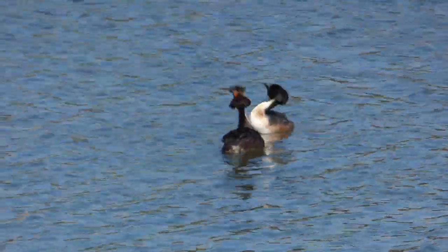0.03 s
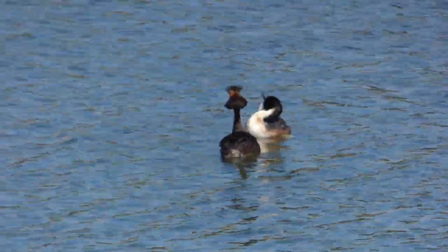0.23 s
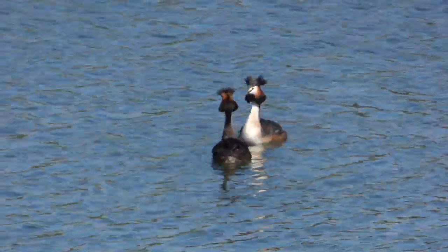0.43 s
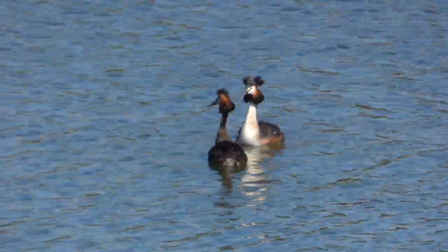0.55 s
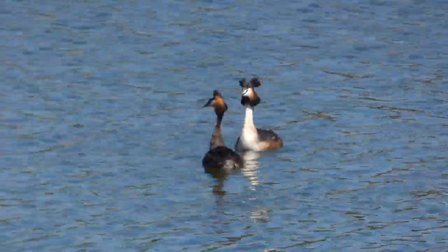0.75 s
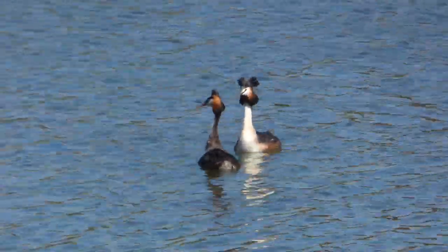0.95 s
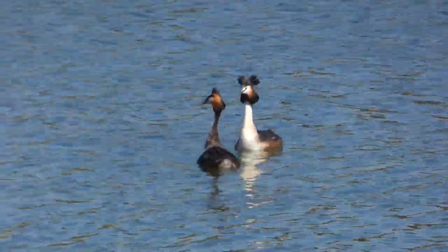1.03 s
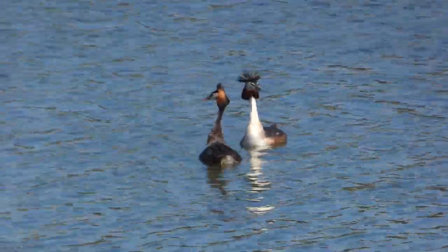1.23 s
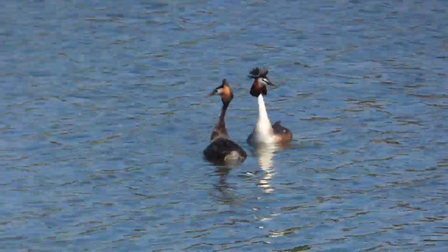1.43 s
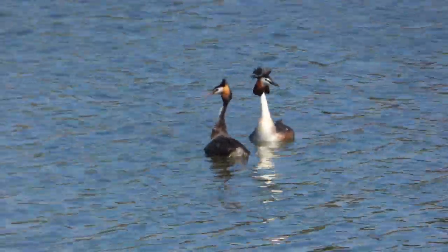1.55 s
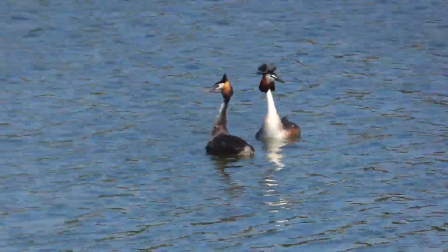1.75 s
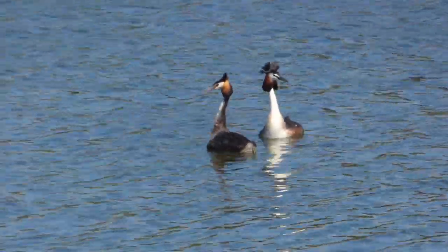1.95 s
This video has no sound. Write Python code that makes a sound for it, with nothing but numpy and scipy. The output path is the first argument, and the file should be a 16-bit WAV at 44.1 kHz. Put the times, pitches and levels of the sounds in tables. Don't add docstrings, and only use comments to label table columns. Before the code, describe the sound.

A waterbird's harsh rasping call stands out on an open lake: after quiet hum and hiss, it starts faintly at 0.2 s, swells by 0.35 s, climbs in pitch with a fast throaty flutter, and ends near 0.85 s with a short reedy echo. From 1.0 to 1.6 s a far, blurred call answers faintly. Light handling taps and rustles follow, mostly after 1.5 s, over distant traffic and faint motor noise.

```python
import sys
import numpy as np
from scipy import signal
from scipy.fft import rfft, irfft
from scipy.io import wavfile
from scipy.ndimage import uniform_filter1d

SR = 44100
rng = np.random.default_rng(int(sys.argv[2]) if len(sys.argv) > 2 else 0)


def store_pcm(level_fs):
    pcm = np.round(np.clip(level_fs, -1, 1) * 32767).astype(np.int16)
    wavfile.write(sys.argv[1], SR, np.atleast_2d(pcm).T)


def convert_level_to_amplitude(level_db):
    exponent = np.asarray(level_db, float) / 20
    return 10 ** exponent


N = 88200
NOTCH_HZ = 10700


def unit(x):
    return x / np.sqrt(np.mean(x ** 2))


def band(x, hz, width):
    return signal.lfilter(*signal.iirpeak(hz, max(hz / width, .3), fs=SR), x)


def walk(rate):
    hold = int(SR / rate)
    steps = np.repeat(rng.standard_normal(N // hold + 1), hold)
    return unit(uniform_filter1d(uniform_filter1d(steps, hold), hold)[:N])


def throat_flaps(t, flap_at):
    period_s, slowing_s, jitter_s = .01456, .0000154, .0005
    width_s, scatter_db = .0018, 1.3
    k = np.arange(-28, 22)
    late, strength = rng.standard_normal((2, len(k)))
    times = flap_at + period_s * k + slowing_s * k ** 2 + jitter_s * late
    pulses = np.exp(-.5 * ((t - times[:, None]) / width_s) ** 2)
    return (convert_level_to_amplitude(scatter_db * strength)[:, None] * pulses).sum(axis=0)


def whistle(hz, flap, second_db, upper_db):
    dip = flap ** 2 * (.16 + .11 * walk(1200))
    pitch = hz * (1 + .006 * walk(250) - dip)
    phase = 2 * np.pi * np.cumsum(pitch) / SR
    tone = 0
    for harmonic, db in [(1, 0), (2, second_db)]:
        tone = tone + convert_level_to_amplitude(db + 1.8 * walk(180)) * np.sin(harmonic * phase)
    for harmonic, db in [(3, 0), (4, -20), (5, -2.5)]:
        blur = 1.1 * walk(700)
        tone += convert_level_to_amplitude(upper_db + db) * np.sin(harmonic * phase + blur)
    sub_hz = .44 * hz * (1 + .06 * walk(200))
    sub = np.sin(2 * np.pi * np.cumsum(sub_hz) / SR)
    return tone + convert_level_to_amplitude(-24 + 4.9 * walk(150)) * sub


# f/Hz, width/Hz, level/dB, steady breath between flaps/dB
THROAT_RESONANCES = [(1150, 260, -10, -12), (2533, 750, 0, -10.5), (3880, 2700, -13, -10),
                     (4885, 1080, -7.5, -9.5), (6300, 1700, -4, -16), (7990, 2250, -19.5, -3),
                     (12500, 3800, -23, -1.5), (14900, 440, -28, -1.5)]


def throat_rasp(since_start, flap):
    opening_s, closed_db_per_octave, breath_db = .13, -5, -1
    shut = closed_db_per_octave * np.clip(1 - since_start / opening_s, 0, 1)
    air = rng.standard_normal(N)
    rasp = np.zeros(N)
    for n, (hz, width, db, steady_db) in enumerate(THROAT_RESONANCES):
        puffs = air * (flap + convert_level_to_amplitude(breath_db + steady_db))
        ring = band(band(puffs, hz, 1.17 * width), hz, 1.22 * width)
        closing_db = shut * np.log2(hz / 2650) * (hz < NOTCH_HZ)
        rasp += (-1) ** n * convert_level_to_amplitude(db + closing_db) * ring
    return rasp


def bird(t, curve, tune, flap_at):
    hz = np.interp(t, *np.array(tune).T)
    s, *levels, _ = np.array(curve).T
    whistle_db, second_db, upper_db, rasp_db = [np.interp(t, s, level) for level in levels]
    on = np.clip((t - s[0]) / 0.0087, 0, 1) * np.clip((s[-1] - t) / 0.015, 0, 1)
    flap = throat_flaps(t, flap_at)
    tone = np.sqrt(2) * convert_level_to_amplitude(whistle_db - 3 * flap) * whistle(hz, flap, second_db, upper_db)
    return on * (tone + 6 * convert_level_to_amplitude(rasp_db) * throat_rasp(t - s[0], flap))


def scatter(call, t, echoes, width):
    out = np.zeros((2, N))
    for delay, spread, decay, db, tilt in echoes:
        rise = np.exp(-.5 * (np.minimum(t - delay, 0) / spread) ** 2)
        shape = rise * np.exp(-np.maximum(t - delay, 0) / decay)
        cloud = rng.standard_normal((3, N)) * shape
        cloud = (cloud[0] + width * cloud[1:]) / np.sqrt(np.sum(shape ** 2))
        bright = call - tilt * np.roll(call, 1)
        out += convert_level_to_amplitude(db) * signal.fftconvolve(cloud, bright[None], axes=1)[:, :N]
    return out


# t/s, whistle level/dB, second overtone/dB, upper overtones/dB, rasp/dB, left minus right/dB
NEAR_CALL = [
    (.214, -55, -15, -3, -48, 1.5),
    (.24, -48, 2, -5, -43.5, 3),
    (.312, -41.5, 0, -29, -39, 0),
    (.322, -34, -17, -33, -38.5, 3),
    (.37, -29.5, -23, -17.5, -40.5, -0.5),
    (.54, -33, -13, -28, -36, -4),
    (.72, -35, -3, -19, -39, -7.5),
    (.81, -41.5, -7, -18, -48.5, -6.5),
    (.86, -49, -39, -36, -54.5, 2),
]
# t/s, f/Hz
NEAR_PITCH = [(.214, 1600), (.24, 1840), (.316, 2100), (.326, 2430), (.46, 2820), (.58, 3040), (.802, 3150),
              (.812, 2690), (.84, 3050)]
# delay t/s, spread t/s, decay t/s, level/dB, treble tilt (0-1)
RIPPLES = [(.002, .001, .008, -14, .5)]
# delay t/s, spread t/s, decay t/s, level/dB, treble tilt (0-1)
SHORE = [
    (.004, .003, .035, -10, .1),
    (0.058, .03, 0.26, -25, .1),
]


def near_bird(t):
    call = bird(t, NEAR_CALL, NEAR_PITCH, flap_at=.612)
    call = call - 0.37 * band(call, NOTCH_HZ, 1600)
    low = signal.sosfilt(signal.butter(2, 4200, fs=SR, output="sos"), call)
    high = signal.sosfilt(signal.butter(2, 4200, "high", fs=SR, output="sos"), call)
    curve = np.array(NEAR_CALL)
    pan_db = np.interp(t, curve[:, 0], curve[:, -1])
    low_pan = convert_level_to_amplitude(np.array([pan_db + 2.5, -pan_db - 2.5]) * .3)
    high_pan = convert_level_to_amplitude(np.array([pan_db, -pan_db]) / 2)
    direct = low * low_pan - high * high_pan
    return direct + scatter(high, t, RIPPLES, 2.86) + scatter(call, t, SHORE, 1.0)


# t/s, whistle level/dB, second overtone/dB, upper overtones/dB, rasp/dB, left minus right/dB (unused)
FAR_CALL = [
    (1.019, -57, -5, -36, -70, 8),
    (1.06, -52, -26, -25, -62.5, -1),
    (1.14, -54.5, -29, -33, -59.5, 17),
    (1.22, -57, -7, -27, -61, 8),
    (1.33, -55, -9, -32, -56.5, 0),
    (1.43, -54, -4.5, -18, -58, 0),
    (1.5, -62, -14, -30, -56.5, -2.5),
    (1.69, -73, -13, -32, -71, 0),
]
# t/s, f/Hz
FAR_PITCH = [(1.022, 1400), (1.05, 2270), (1.13, 2320), (1.19, 2720), (1.3, 3060), (1.41, 3130),
             (1.5, 3220)]
# delay t/s, spread t/s, decay t/s, level/dB, treble tilt (0-1)
FAR_SMEAR = [(.01, .005, .07, -6, .1)]


def far_bird(t):
    air_loss = signal.butter(2, 8100, fs=SR, output="sos")
    far = signal.sosfilt(air_loss, bird(t, FAR_CALL, FAR_PITCH, flap_at=1.4))
    return far + scatter(far, t, FAR_SMEAR, 1.0)


def left_right(mid, side):
    return np.array([mid + side, mid - side])


# t/s, level/dB, f/Hz, width/Hz, length t/s
HANDLING_TAPS = [
    (0.382, -42.5, 1060, 500, 0.016),
    (0.842, -44, 1150, 807, 0.0043),
    (0.86, -44, 990, 297, .004),
    (0.956, -54, 690, 600, .004),
    (1.545, -43, 511, 51, 0.015),
    (1.694, -45, 460, 79.5, 0.011),
    (1.734, -54, 2980, 2960, 0.0073),
    (1.8, -45, 455, 305, 0.0025),
    (1.849, -56.5, 2200, 2480, .005),
]


def handling_taps(t):
    out = np.zeros((2, N))
    for s, db, hz, width, length in HANDLING_TAPS:
        noise = unit(band(rng.standard_normal((2, N)), hz, width))
        mid, side = convert_level_to_amplitude(db) * np.exp(-.5 * ((t - s) / length) ** 2) * noise
        out += left_right(mid, 0.34 * side)
    return out


# t/s, level/dB, f/Hz, width/Hz, rise t/s
CLOTH_AND_LEAVES = [
    (1.72, -52.5, 4900, 3500, 0.01),
    (1.74, -53, 1010, 600, 0.039),
    (0.14, -65, 4000, 190, 0.022),
    (0.041, -67, 4600, 500, 0.097),
    (0.27, -53, 940, 130, 0.023),
    (1.9, -60.5, 3300, 3300, 0.047),
    (0.22, -55, 495, 100, 0.048),
    (1.6, -54, 4700, 1400, 0.0054),
    (1.4, -61.5, 2120, 250, 0.097),
]


def rustles(t):
    out = np.zeros((2, N))
    for s, db, hz, width, rise in CLOTH_AND_LEAVES:
        fade = 5.5 * rise
        shape = np.exp(-.5 * (np.minimum(t - s, 0) / rise) ** 2 - np.maximum(t - s, 0) / fade)
        noise = unit(band(rng.standard_normal((2, N)), hz, width))
        mid, side = convert_level_to_amplitude(db + 2.1 * walk(60.05)) * shape * noise
        out += left_right(mid, 0.53 * side)
    return out


# f/Hz, width/Hz, level/dB
MOTOR_BANDS = [(500, 90, -68), (826, 130, -58), (1096, 40, -67)]


def camera_motor():
    side = np.zeros(N)
    for hz, width, db in MOTOR_BANDS:
        side += convert_level_to_amplitude(db + 1.5 * walk(11)) * unit(band(rng.standard_normal(N), hz, width))
    return left_right(0, side)


def coloured(spectrum):
    octave = np.log2(np.maximum(np.arange(N // 2 + 1) * SR / N, 1))
    hz, db = np.array(spectrum).T
    whole = rfft(rng.standard_normal(N)) * convert_level_to_amplitude(np.interp(octave, np.log2(hz), db))
    swell = .6 * walk(0.92)
    out = np.zeros(N)
    for centre in np.arange(4, 14.6, .5):
        window = np.cos(np.pi * np.clip(octave - centre, -.5, .5)) ** 2
        out += convert_level_to_amplitude(swell + 0.69 * walk(9.32)) * irfft(whole * window, N)
    return unit(out)


# f/Hz, level/dB per Hz
HUM_MID = [(15, -60), (25, -61), (53, -19.5), (173, -1), (346, -6.5), (370, -17.5), (490, -5), (541, -13),
           (1300, -22), (1690, -26), (2860, -120)]
# f/Hz, level/dB per Hz
HUM_OPPOSITE = [(15, -85), (25, -48), (409, -7.5), (444, -24), (490, -2.5), (1010, -2), (1300, -13),
                (1690, -57), (2860, -120)]
# f/Hz, level/dB per Hz
HISS_SPECTRUM = [(760, 6), (1300, -6.5), (1940, -6), (2730, -7), (3320, -7), (5070, -11.5), (15300, -17)]


def hum_and_hiss():
    mid = convert_level_to_amplitude(-47) * coloured(HUM_MID) + convert_level_to_amplitude(-60) * coloured(HISS_SPECTRUM)
    side = convert_level_to_amplitude(-56) * coloured(HUM_OPPOSITE) + convert_level_to_amplitude(-63) * coloured(HISS_SPECTRUM)
    return left_right(mid, side)


def scene():
    t = np.arange(N) / SR
    birds = near_bird(t) + far_bird(t)
    return birds + handling_taps(t) + rustles(t) + camera_motor() + hum_and_hiss()


def band_limit(x):
    return signal.sosfilt(signal.butter(12, 15820, fs=SR, output="sos"), x)


def record(dry):
    soft = signal.sosfilt(signal.cheby2(12, 45, 15350, fs=SR, output="sos"), dry)
    power = uniform_filter1d(dry[0] ** 2, size=2048)
    quiet = uniform_filter1d(1. * (power < convert_level_to_amplitude(2 * -41)), size=512)
    whine = quiet * convert_level_to_amplitude(-88) * np.sqrt(2) * np.sin(2 * np.pi * 15625 * np.arange(N) / SR)
    return band_limit(soft + whine - .003)


dry = scene()
out = record(dry)
store_pcm(out)
```